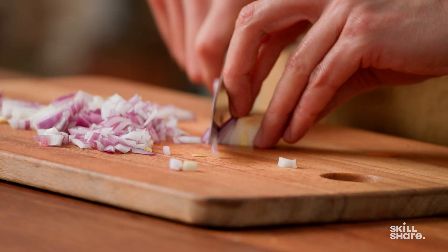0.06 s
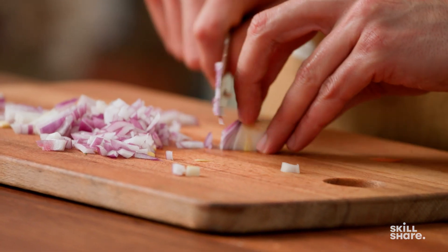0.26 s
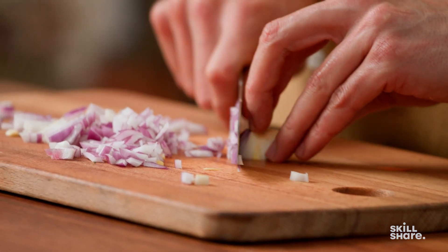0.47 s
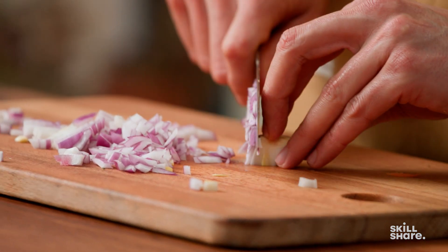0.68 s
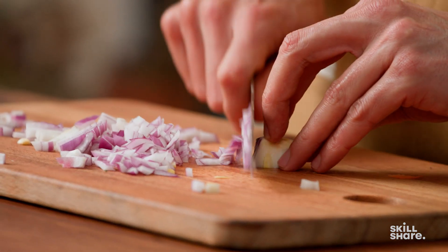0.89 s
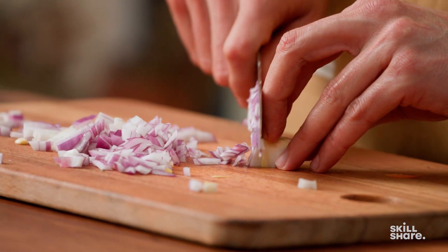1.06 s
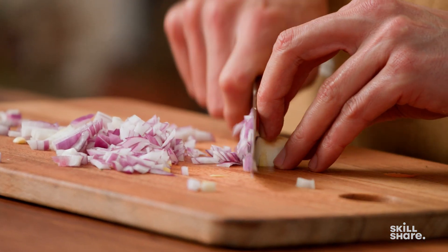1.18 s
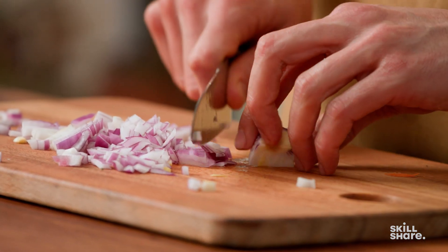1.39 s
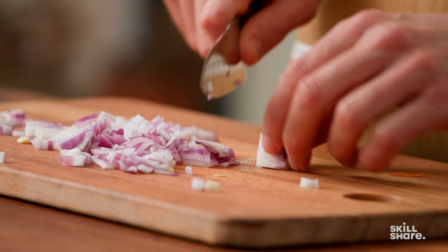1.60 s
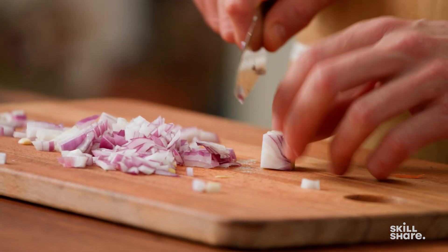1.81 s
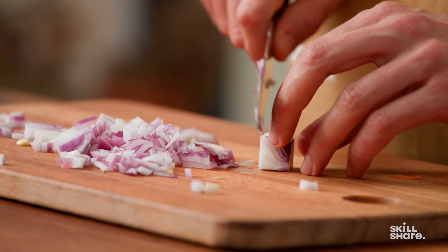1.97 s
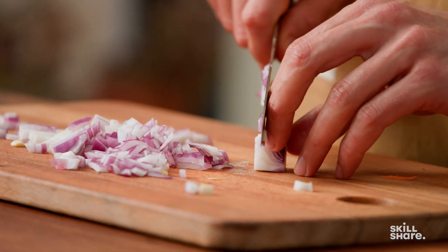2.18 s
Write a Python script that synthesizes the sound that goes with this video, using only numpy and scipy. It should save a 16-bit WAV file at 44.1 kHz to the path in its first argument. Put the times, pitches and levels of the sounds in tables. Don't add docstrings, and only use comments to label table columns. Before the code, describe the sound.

Knife chopping an onion on a wooden board, four crisp crunches each ending in a knock

```python
import sys
import numpy as np
from scipy import signal
from scipy.fft import rfft, irfft
from scipy.io import wavfile
from scipy.ndimage import uniform_filter1d

SR = 44100
rng = np.random.default_rng(int(sys.argv[2]) if len(sys.argv) > 2 else 0)


def gain_from_db(level_db):
    decades = np.asarray(level_db, float) / 20
    return 10 ** decades


def put_to_file(sound):
    columns = np.atleast_2d(sound).T
    safe = np.clip(columns, -1, 1)
    whole_steps = np.round(safe * 32767)
    wavfile.write(sys.argv[1], SR, whole_steps.astype(np.int16))


N = 99225


def unit(x):
    return x / np.sqrt(np.mean(x ** 2))


def fall(t, t60):
    return (t >= 0) * np.exp(-np.log(1000) * np.maximum(t, 0) / t60)


def band(x, hz, width):
    return signal.lfilter(*signal.iirpeak(hz, hz / width, fs=SR), x)


def bands(x, table):
    return unit(sum(gain_from_db(db) * band(band(x, hz, w), hz, w) for hz, w, db in table))


def place(out_t, x, at):
    return np.interp(out_t - at, np.arange(len(x)) / SR, x, left=0, right=0)


def walk(rate):
    hold = int(SR / rate)
    steps = np.repeat(rng.standard_normal(N // hold + 1), hold)
    return uniform_filter1d(uniform_filter1d(steps, hold), hold)[:N]


# pitch_hz [Hz], level_db [dB], t60_s [s]
BOARD_MODES = [(453, -26.5, 0.056), (629, -27, .12), (692.1, -21.5, 0.12), (953, -14.5, 0.012),
               (1014.4, 0, 0.0036), (1269, -31.5, 0.3), (1053, -29, 0.21), (1262, -22, 0.012),
               (1500, -.5, 0.0036), (1580, -23, 0.044), (2050, -9, 0.0032), (2503, -17.5, 0.022)]


def board_knock(u, contact_ms, tilt):
    scatter_db, low_hz, top_hz = 1.1, 330, 4320
    push = np.exp(-(4 * (u[:64] * 1000 / contact_ms - 1 / 2)) ** 2)
    ring = 0
    for (hz, db, t60), e in zip(BOARD_MODES, tilt):
        ring = ring + gain_from_db(db + scatter_db * e) * fall(u, t60) * np.cos(2 * np.pi * hz * u)
    knock = np.convolve(push, ring)[:len(u)]
    knock = signal.sosfilt(signal.cheby2(4, 33, top_hz, fs=SR, output="sos"), knock)
    knock = signal.sosfilt(signal.butter(3, low_hz, "high", fs=SR, output="sos"), knock)
    return knock / knock.max()


# delay_ms [ms], gain [signed ratio]
EARLY_ECHOES = [(0, 1), (.62, -.75), (.93, .8), (2.05, .2), (3.97, .3), (5.7, .36), (6.4, .15), (8.05, .25)]


def early_echoes(t, knock, at):
    return sum(gain * place(t, knock, at + delay_ms / 1000) for delay_ms, gain in EARLY_ECHOES)


# pitch_hz [Hz], level_db [dB]
TABLE_MODES = [(55, 1), (125, -5.5), (280, -0.5)]


def table_thud(t):
    return fall(t, 0.22) * sum(gain_from_db(db) * np.sin(2 * np.pi * hz * t) for hz, db in TABLE_MODES)


# start_s [s], level_db [dB], contact_ms [ms], edge_tick_db [dB], thud_db [dB]
BLOWS_ON_BOARD = [
    (0.2081, -12, 0.52, -49, -48),
    (0.5743, -11.5, 0.44, -47.5, -44.5),
    (0.9251, -13.5, 0.56, -53, -50.5),
    (1.2779, -12, .5, -48, -54.5),
]


def blows(t):
    u = t[:SR // 8]
    direct, echoed = np.zeros(N), np.zeros(N)
    crack_noise = bands(rng.standard_normal(len(u)), [(3700, 1500, 0)])
    crack = gain_from_db(-43.5) * fall(u, 0.02) * crack_noise
    tilts = rng.standard_normal((len(BLOWS_ON_BOARD), len(BOARD_MODES)))
    for (at, db, contact_ms, tick_db, thud_db), tilt in zip(BLOWS_ON_BOARD, tilts):
        knock = gain_from_db(db) * board_knock(u, contact_ms, tilt) + crack
        tick = gain_from_db(tick_db) * fall(u, 0.0061) * bands(rng.standard_normal(len(u)), CRUNCH_IN_AIR)
        direct += place(t, knock + tick, at)
        echoed += early_echoes(t, knock, at) + place(t, tick, at)
        echoed += gain_from_db(thud_db) * table_thud(t - at)
    return direct, echoed


def bursting_cells():
    cells_per_s, spread_db, surge_db = 14000, 2.5, 1.5
    bursts = (rng.random(N) < cells_per_s / SR) * rng.standard_normal(N)
    bursts = bursts * gain_from_db(spread_db * rng.exponential(size=N))
    return bursts * gain_from_db(surge_db * walk(160))


# pitch_hz [Hz], width_hz [Hz], level_db [dB]
CRUNCH_IN_AIR = [(6910, 2100, -5), (10230, 3700, 1.5), (13890, 1600, 1), (4650, 1400, -29),
                 (8200, 2500, -10.5), (12100, 2200, -10)]
# pitch_hz [Hz], width_hz [Hz], level_db [dB]
CRUNCH_IN_BOARD = [(1010, 550, 5.5), (1800, 420, 1), (2600, 600, -7), (500, 300, -4.5)]
# start_s [s], level_db [dB], t60_s [s], board_share_db [dB]
EDGE_TOUCHES = [
    (.1075, -53.5, .14, -2.5),
    (.1475, -61, .2, -3.5),
    (0.47, -63.5, 0.17, -27),
    (1.378, -78, 0.015, 36),
    (2.2, -73, 0.025, -7),
    (.001, -91.5, 0.44, 15.5),
]
# start_s [s], end_s [s], swell_s [s], level_db [dB], board_share_db [dB]
ONION_CUTS = [
    (.17, 0.202, 0.014, -49, 1),
    (.52, 0.568, 0.028, -47.5, -1),
    (.845, 0.924, 0.027, -53, -4.5),
    (1.21, 1.281, .027, -50.5, -2),
    (.785, .85, .01, -80, 3),
    (1.165, 1.222, 0.012, -73.5, -1),
    (1.673, 1.76, .03, -82.5, -16),
]


def onion(t):
    cells = bursting_cells()
    in_air, in_board = bands(cells, CRUNCH_IN_AIR), bands(cells, CRUNCH_IN_BOARD)
    out = np.zeros(N)
    for at, db, t60, share_db in EDGE_TOUCHES:
        click = gain_from_db(5) * fall(t - at, 0.01)
        out += gain_from_db(db) * (fall(t - at, t60) + click) * (in_air + gain_from_db(share_db) * in_board)
    for start, end, swell_s, db, share_db in ONION_CUTS:
        press = np.clip((t - start) / swell_s, 0, 1) ** 1.9
        release = np.where(t < end, 1, fall(t - end, 0.074))
        out += gain_from_db(db) * press * release * (in_air + gain_from_db(share_db) * in_board)
    return out


# pitch_hz [Hz], t60_s [s], level_db [dB]
ROOM_BANDS = [(200, .4, 1), (502.7, 0.36, 0), (1034, .41, -1.5), (1856.7, 0.43, -5), (4000, 0.4, 0.5),
              (8000, 0.17, -4.5), (14000, 0.17, -10.5)]


def kitchen(x):
    build_s, end_s, room_db = 0.0064, 0.32, -10
    u = np.arange(SR // 2 + SR // 4) / SR
    tail = 0
    for hz, t60, db in ROOM_BANDS:
        octave = unit(band(rng.standard_normal(len(u)), hz, hz * 1.09))
        tail = tail + gain_from_db(db) * octave * np.sqrt(hz / 1000) * fall(u, t60)
    tail = tail * (1 - np.exp(-(u / build_s) ** 2)) / (1 + (u / end_s) ** 6)
    return signal.fftconvolve(x, tail * gain_from_db(room_db) / np.sqrt(SR / 30))[:N]


def gate(x):
    split_hz, threshold_db, window_s = 6000, -78.5, 0.015
    hz = np.arange(N // 2 + 1) * SR / N
    treble = irfft(rfft(x) * (1 - 1 / (1 + (hz / split_hz) ** 8)), N)
    power = np.abs(uniform_filter1d(treble ** 2, int(window_s * SR))) + 1e-18
    return x - treble / (1 + (power / gain_from_db(threshold_db) ** 2) ** 2)


# pitch_hz [Hz], density_db [dB per Hz]
AIR_SPECTRUM = [(12, -34), (20, 9), (70, -19), (150, -24), (328, -31), (434, -37.5), (660, -39.5),
                (3440, -47), (16000, -54.5)]
# time_s [s], level_db [dB]
RUMBLE_LEVELS = [(0, 17), (.3, 1), (.6, 7), (1, 7.5), (1.3, 3.5), (1.5, 16), (1.75, 2.5), (2.1, 2.5),
                 (2.25, 5)]


def air(t):
    hz = np.arange(N // 2 + 1) * SR / N + 1
    table_hz, table_db = np.array(AIR_SPECTRUM).T
    shape = rfft(rng.standard_normal(N)) * gain_from_db(np.interp(np.log(hz), np.log(table_hz), table_db))
    scale = gain_from_db(-62) / np.std(irfft(shape, N))
    low = 1 / (1 + (hz / 90) ** 4)
    rumble_swell = gain_from_db(np.interp(t, *np.array(RUMBLE_LEVELS).T) - 2 * walk(6))
    hiss_swell = gain_from_db(2.0 * walk(4.4))
    return scale * (rumble_swell * irfft(shape * low, N) + hiss_swell * irfft(shape * (1 - low), N))


def scene():
    t = np.arange(N) / SR
    direct, echoed = blows(t)
    crunch = onion(t)
    kitchen_tail = kitchen(direct + 0.45 * crunch)
    return (gate(echoed + crunch + kitchen_tail) + air(t))[None]


def roll_off(x):
    return signal.sosfilt(signal.butter(12, 16560, fs=SR, output="sos"), x)


def record(dry):
    low_pass = signal.ellip(8, 0.2, 60, 15900, fs=SR, output="sos")
    mix = signal.sosfilt(low_pass, dry)
    return roll_off(mix)


dry = scene()
out = record(dry)
put_to_file(out)
```